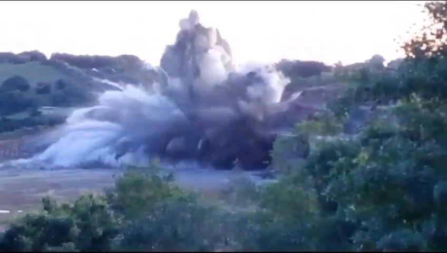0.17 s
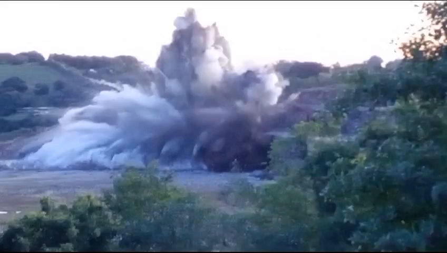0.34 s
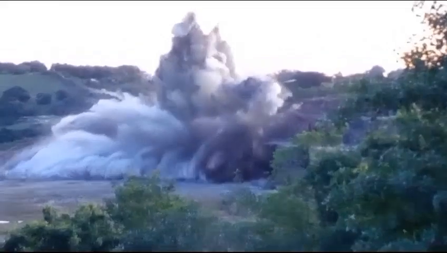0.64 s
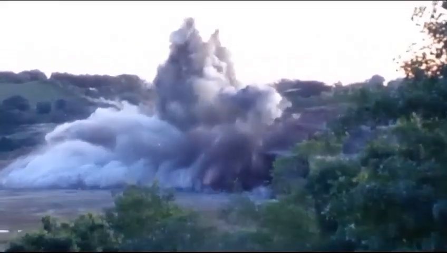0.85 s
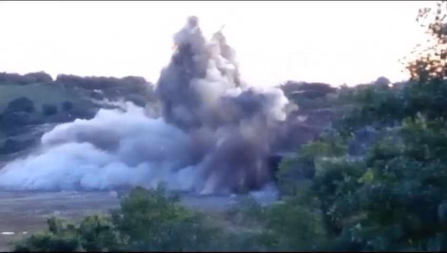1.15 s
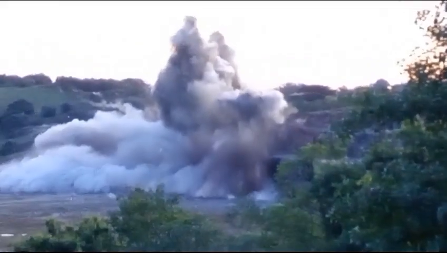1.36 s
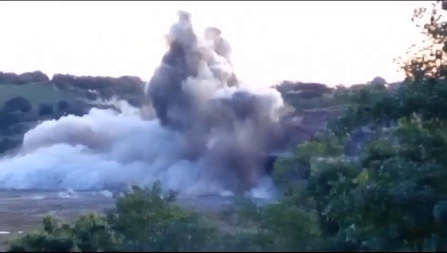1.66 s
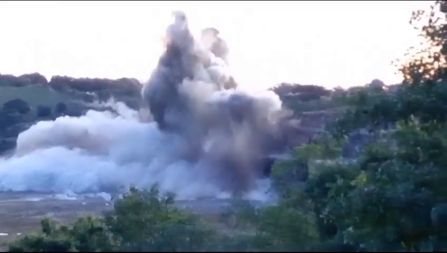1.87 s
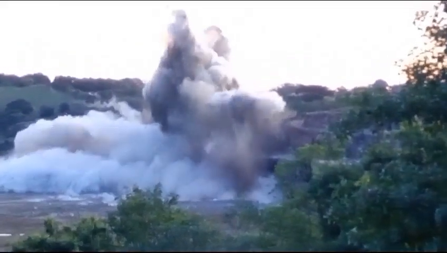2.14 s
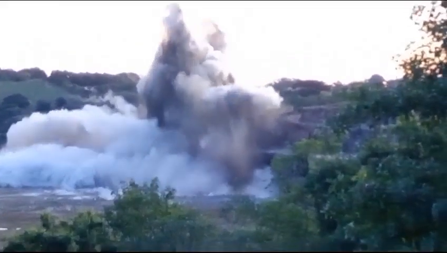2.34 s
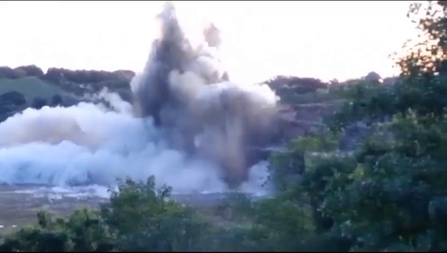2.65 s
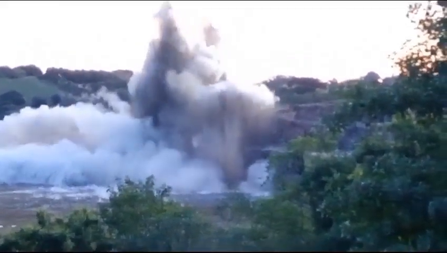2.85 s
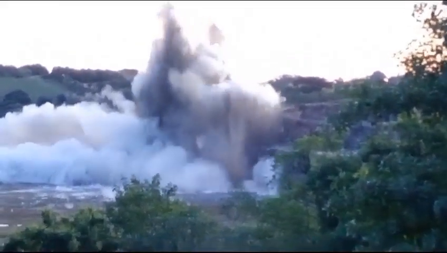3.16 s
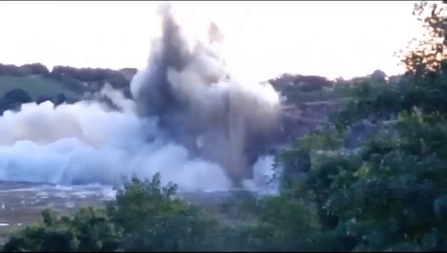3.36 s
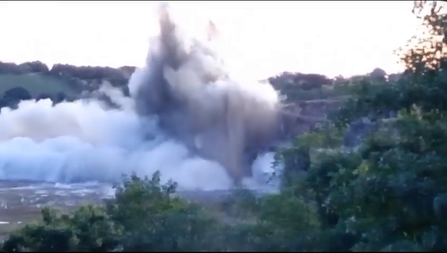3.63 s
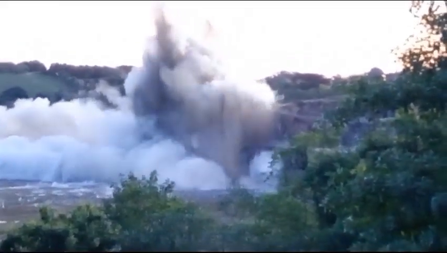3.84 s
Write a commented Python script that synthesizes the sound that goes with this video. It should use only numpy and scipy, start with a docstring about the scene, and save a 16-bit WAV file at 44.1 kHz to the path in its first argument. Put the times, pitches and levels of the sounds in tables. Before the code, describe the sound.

Rock blast heard across an open valley: ragged cracks and heavy low thuds crowd the first half second, then rumble dies away, a hill echo returns, and falling rock grows louder under faint gritty hiss.

```python
"""A volley of sharp cracks over a deep boom that overloads the microphone: a quarry blast across a valley.
Cracks are shock fronts with noise bursts; boom and roar are dense random impacts, filtered and levelled.
The roar dies away and a separate, similar roar swells back from the hills; heavy blocks thud as decaying sines.
Towards the end thrown rock clatters louder (random impacts in a stronger noise wash)
under a growing, flickering hiss of grit."""
import sys
import numpy as np
from scipy import signal
from scipy.fft import rfft, irfft, next_fast_len
from scipy.io import wavfile
from scipy.ndimage import uniform_filter1d, map_coordinates

SR = 44100
rng = np.random.default_rng(int(sys.argv[2]) if len(sys.argv) > 2 else 0)


def to_wav(s):
    """Save 16-bit WAV."""
    ch = np.atleast_2d(s).T  # columns
    pcm = np.round(np.clip(ch, -1, 1) * 32767)  # PCM
    wavfile.write(sys.argv[1], SR, pcm.astype(np.int16))


N = 176400


def amp(db):
    """Decibels to gain."""
    return 10 ** (np.asarray(db) / 20)


def unit(x):
    """Scale to rms 1."""
    return x / np.sqrt(np.mean(x ** 2) + 1e-20)


def clock():
    """Time of each sample [s]."""
    return np.arange(N) / SR


def level(rows):
    """Gain per sample, interpolated in dB through (time [s], level [dB]) points."""
    return amp(np.interp(clock(), *np.transpose(rows)))


def swell_db(peak_s, peak_db, rise_db_per_s, fall_db_per_s):
    """Level in dB that rises straight to a peak and falls straight from it."""
    t = clock() - peak_s
    return peak_db + np.minimum(rise_db_per_s * t, -fall_db_per_s * t)


def wobble(knots_per_s):
    """Smooth random curve through normally distributed knots."""
    knots = rng.standard_normal(2000)
    return map_coordinates(knots, [clock() * knots_per_s], mode="wrap")


def coloured(x, colour):
    """Minimum-phase filter of unit power gain through (frequency [Hz], relative gain [dB]) points."""
    m = 2 * next_fast_len(N // 2 + 8192)
    hz, db = np.transpose(colour)
    log_hz = np.log(np.fft.rfftfreq(m, 1 / SR) + 1)
    gain = unit(amp(np.interp(log_hz, np.log(hz), db)))
    # Folding the cepstrum onto positive time makes the filter causal.
    cepstrum = irfft(np.log(gain), m)
    cepstrum[1:m // 2] *= 2
    cepstrum[m // 2 + 1:] = 0
    return irfft(rfft(x, m) * np.exp(rfft(cepstrum)), m)[:N]


def patter(rate_hz, spread_db, wash_db):
    """Random impacts of uneven size in a wash of merged ones, rms 1."""
    chance = rng.random(N)
    size = np.minimum(rng.exponential(size=N), 4)
    sign = rng.choice([-1, 1], N)
    hits = (chance < rate_hz / SR) * sign * amp(spread_db * size)
    return unit(unit(hits) + amp(wash_db) * rng.standard_normal(N))


def coloured_patter(colour, rate_hz, spread_db, wash_db):
    """Random impacts filtered to a colour, rms 1."""
    return unit(coloured(patter(rate_hz, spread_db, wash_db), colour))


# Bursting rock and gas: (time [s], relative level [dB], Gaussian length [s], treble share [dB])
CRACK_EVENTS = [(0.024, -5, 0.0033, 2), (0.04, -5.5, 0.0033, 1.5), (0.052, -7.5, 0.0021, 5),
                (0.055, -7, 0.0033, -1.5), (.066, -9.5, 0.0078, -2), (0.069, -8, 0.0032, -0.5),
                (.075, -11, 0.0024, 11.5), (.102, -2.5, 0.0015, -5), (.110, -12.5, 0.002, 4.5),
                (0.128, -17, 0.005, 2), (0.18, -9.5, 0.0029, -2), (.194, -7.5, 0.0076, -3),
                (0.249, -11.5, 0.0011, 4), (0.28, -13.5, 0.0021, 3), (0.322, -12.5, 0.0018, -2),
                (0.331, -14, 0.004, -4.5), (0.405, -21, 0.0016, 2), (.435, -25, .002, -14),
                (0.478, -24, 0.0017, 1), (0.524, -17, .002, -22), (0.533, -20.5, .002, -6),
                (0.577, -21, .002, -12), (0.624, -18.5, 0.0023, -24), (0.719, -16.5, 0.0029, -33.5),
                (0.736, -17.5, .003, -16.5), (0.855, -20, 0.0074, -22), (1.011, -20.5, .0015, -20),
                (1.069, -24, 0.0065, -17.5), (1.136, -20.5, 0.0037, -27), (1.196, -23, 0.017, -34.5),
                (3.962, -34, 0.0023, -22), (3.973, -24, 0.0026, -25)]
# Spectra of crack body and treble snap: (frequency [Hz], relative gain [dB])
CRACK_BODY_COLOUR = [(100, 3), (500, 12), (1900, 7), (2800, -1), (4000, -38), (8000, -44), (16000, -68)]
SNAP_SPECTRUM = [(500, -13.5), (2000, 7.5), (3600, 3.5), (5600, 0.5), (6800, -9.5), (8400, -11.5),
                 (10500, -20), (15500, -25)]
BODY_OFFSET_DB, SNAP_OFFSET_DB = -0.5, -6.5
BODY_FRONT_DB, SNAP_FRONT_DB = 9.5, 9.5  # relative to the burst
WALL_DB, WALL_T60_S = -9, 0.087


def cracks():
    """Each crack is a steep shock front and a short ragged burst, scattered by the quarry walls."""
    body, snap = np.zeros(N), np.zeros(N)
    body_noise, snap_noise = rng.standard_normal((2, N))
    t = np.arange(SR // 20) / SR
    for start_s, db, length_s, treble_db in CRACK_EVENTS:
        start = round(start_s * SR)
        burst = np.exp(-(t / length_s) ** 2)[:N - start]
        span = slice(start, start + len(burst))
        front = np.arange(len(burst)) == 0  # one-sample impulse
        body_crack = burst * body_noise[span] + amp(BODY_FRONT_DB) * front
        snap_crack = burst * snap_noise[span] + amp(SNAP_FRONT_DB) * front
        body[span] += amp(db + BODY_OFFSET_DB) * body_crack
        snap[span] += amp(db + SNAP_OFFSET_DB + treble_db) * snap_crack
    direct = coloured(body, CRACK_BODY_COLOUR) + coloured(snap, SNAP_SPECTRUM)
    tail = (rng.standard_normal(N) * amp(-60 * clock() / WALL_T60_S))[:SR]
    scattered = signal.fftconvolve(direct, tail / np.linalg.norm(tail))[:N]
    return direct + amp(WALL_DB) * scattered


def low_waves(colour):
    """Overlapping low pressure waves, evened to a short-term rms near 1."""
    waves = coloured_patter(colour, rate_hz=700, spread_db=2, wash_db=-0.5)
    local_power = np.abs(uniform_filter1d(waves ** 2, size=3000))
    return waves / np.sqrt(local_power + 1e-6)


# Boom envelope: (time [s], level [dB])
BOOM_LEVEL = [(0, -7), (.2, -10), (.42, -16), (.46, -18), (.53, -15.5), (.6, -19), (.7, -22.5), (.8, -18.5),
              (.88, -24.5), (.95, -22.5), (1.08, -25), (1.21, -23.5), (1.28, -30.5), (1.8, -34.5),
              (2.5, -42.5), (4, -53.5)]
# Spectra of boom and deeper rumble: (frequency [Hz], relative gain [dB])
BOOM_SPECTRUM = [(20, -38), (35, -21), (60, -10), (90, -7.5), (125, 1), (170, -4), (260, -5.5),
                 (350, -12.5), (480, -34), (1200, -85.5)]
RUMBLE_SPECTRUM = [(20, -17), (38, -28.5), (62, -0.5), (85, 10), (115, -4), (220, -32), (600, -75.5)]
RUMBLE_PEAK_S, RUMBLE_DB, RUMBLE_RISE_DB_PER_S, RUMBLE_FALL_DB_PER_S = 0.77, -28.5, 1, 14


def boom():
    """The rock face heaves out low waves; a deeper rumble swells below and fades before the boom's tail."""
    heave = low_waves(BOOM_SPECTRUM) * level(BOOM_LEVEL) * amp(0.78 * wobble(25.1))
    rumble_db = swell_db(RUMBLE_PEAK_S, RUMBLE_DB, RUMBLE_RISE_DB_PER_S, RUMBLE_FALL_DB_PER_S)
    rumble = low_waves(RUMBLE_SPECTRUM) * amp(rumble_db + 1.9 * wobble(10.7))
    return heave + rumble


# Roar envelope: (time [s], level [dB])
ROAR_LEVEL = [(0, -12), (.06, -12), (.15, -12.5), (.195, -15.5), (.235, -16.5), (.29, -14.5), (.345, -21.5),
              (.375, -16.5), (.455, -21), (.53, -18), (.6, -25.5), (.68, -25.5), (.74, -25), (.85, -25.5),
              (.89, -28), (1.25, -33.5), (2.5, -43), (4, -49)]
# Roar spectrum: (frequency [Hz], relative gain [dB])
ROAR_SPECTRUM = [(100, -19.5), (300, 1.5), (430, -1.5), (570, 4), (1000, -2.5), (1900, -4.5), (2500, -12),
                 (3300, -20), (5300, -32), (7000, -49), (10000, -80), (15000, -87)]
CRACKLE_DB, CRACKLE_FALL_DB_PER_S = -20.5, 55


def roar():
    """Breaking rock: dense fractures, with a bright crackle that dies first."""
    body = coloured_patter(ROAR_SPECTRUM, rate_hz=1500, spread_db=5, wash_db=1)
    body = body * level(ROAR_LEVEL) * amp(1.0 * wobble(55.2))
    crackle = coloured_patter(SNAP_SPECTRUM, rate_hz=1100, spread_db=2.5, wash_db=-6.5)
    crackle_db = CRACKLE_DB - CRACKLE_FALL_DB_PER_S * clock()
    return body + crackle * amp(crackle_db + 1.36 * wobble(160))


# Heavy blocks and gas surges: (time [s], level before envelope [dB], pitch [Hz])
THUD_EVENTS = [(0.061, -6, 32), (0.257, -4, 40.4), (.343, -5, 134), (.393, 1, 117), (0.418, 1, 156),
               (.525, -4.5, 148), (0.631, -3, 138), (.745, -7, 137), (0.792, -7, 124), (0.939, -12, 109),
               (1.142, -7.5, 102), (1.189, -13, 119), (1.225, -15, 110), (3.947, -27.5, 166)]
THUD_RISE_S, THUD_DECAY_S = 0.0026, 0.011


def thuds():
    """Each heavy blow is a sine with a fast rise and an exponential decay."""
    out = np.zeros(N)
    for start_s, db, hz in THUD_EVENTS:
        t = np.maximum(clock() - start_s, 0)
        envelope = (1 - np.exp(-t / THUD_RISE_S)) * np.exp(-t / THUD_DECAY_S)
        out -= amp(db) * np.sin(2 * np.pi * hz * t) * envelope
    return out


def patchy(x):
    """Flicker in narrow, short-lived bands: smoothed random gain over time and frequency, rms 1."""
    bands = signal.stft(x, nperseg=1024)[2]
    field = rng.standard_normal(bands.shape)
    field = uniform_filter1d(field, size=GRIT_PATCH_BINS, axis=0)
    field = uniform_filter1d(field, size=GRIT_PATCH_FRAMES, axis=1)
    flickering = bands * amp(GRIT_PATCH_DB * unit(field))
    return unit(signal.istft(flickering, nperseg=1024)[1][:N])


# Envelopes of landing stones and grit: (time [s], level [dB])
STONE_LEVEL = [(0, -43.5), (2, -37), (2.6, -39), (3.3, -34), (3.5, -37), (3.66, -33), (3.715, -36),
               (3.76, -32.5), (3.93, -30.5), (4, -32)]
GRIT_LEVEL = [(0, -84), (2.4, -66.5), (2.85, -62), (3.2, -53.5), (3.5, -52), (3.78, -48.5), (4, -49.5)]
# Spectra of stones and grit: (frequency [Hz], relative gain [dB])
STONE_SPECTRUM = [(20, -38), (45, -8.5), (90, 0), (170, -1), (310, -0.5), (420, -8.5), (640, -1.5),
                  (850, -10.5), (1400, -9.5), (2100, -11.5), (3000, -23), (5000, -42.5), (8000, -54),
                  (15000, -70)]
GRIT_SPECTRUM = [(1000, -2), (3000, 1.5), (3800, 2.5), (4200, 5), (4800, -1.5), (6900, -8), (8000, -22),
                 (9200, -18.5), (10200, -25.5), (11400, -21), (13000, -30), (15500, -32)]
GRIT_PATCH_DB, GRIT_PATCH_BINS, GRIT_PATCH_FRAMES = 3.5, 2, 10


def rockfall():
    """Thrown stones land as random impacts, louder towards the end; grit hisses down with them."""
    stones = coloured_patter(STONE_SPECTRUM, rate_hz=380, spread_db=3.5, wash_db=2.5)
    stones = stones * level(STONE_LEVEL) * amp(0.2 * wobble(18))
    grit = patchy(coloured(patter(rate_hz=1500, spread_db=4.5, wash_db=3.5), GRIT_SPECTRUM))
    grit = grit * level(GRIT_LEVEL) * amp(1.0 * wobble(12))
    return stones + grit


# Spectrum of the roar from the hills: (frequency [Hz], relative gain [dB])
ECHO_SPECTRUM = [(80, -10), (300, -3), (440, -2.5), (590, 3.5), (900, -3), (1300, -1), (2000, -3),
                 (2600, -11), (3400, -21), (4200, -32), (5500, -32), (7000, -58), (14000, -61)]
ECHO_PEAK_S, ECHO_DB, ECHO_RISE_DB_PER_S, ECHO_FALL_DB_PER_S = 1.563, -30, 9, 12


def hill_echo():
    """Roar back from the far slopes: separate dense impacts that swell and fade."""
    echo = coloured_patter(ECHO_SPECTRUM, rate_hz=900, spread_db=1.5, wash_db=3)
    echo_db = swell_db(ECHO_PEAK_S, ECHO_DB, ECHO_RISE_DB_PER_S, ECHO_FALL_DB_PER_S)
    return echo * amp(echo_db + 0.8 * wobble(25))


SPRAY_S, SPRAY_LENGTH_S, SPRAY_DB = 1.012, 0.07, -51.5


def spray():
    """One brief, faint hiss of grit: noise with a sudden start and a half-Gaussian fade."""
    t = clock() - SPRAY_S
    envelope = (t > 0) * np.exp(-(t / SPRAY_LENGTH_S) ** 2)
    hiss = unit(coloured(rng.standard_normal(N), SNAP_SPECTRUM))
    return amp(SPRAY_DB) * envelope * hiss


def scene():
    """All sources at the one microphone."""
    blast = cracks() + boom() + roar() + thuds()
    return (blast + rockfall() + hill_echo() + spray())[None]


LOW_CUT_HZ, TOP_HZ = 36, 15800
OVERLOAD, KNEE = 0.87, 4.2  # ceiling [full scale], knee exponent


def record(dry):
    """Microphone: sheds the deepest bass, rounds off the loudest peaks, stops at the band limit."""
    low_cut = signal.butter(2, LOW_CUT_HZ, "highpass", fs=SR, output="sos")
    lean = signal.sosfilt(low_cut, dry)
    squashed = lean / (1 + np.abs(lean / OVERLOAD) ** KNEE) ** (1 / KNEE)
    m = next_fast_len(N + SR // 2)
    passband = np.fft.rfftfreq(m, 1 / SR) < TOP_HZ
    return irfft(rfft(squashed, m) * passband, m)[..., :N]


dry = scene()
out = record(dry)
to_wav(out)
```